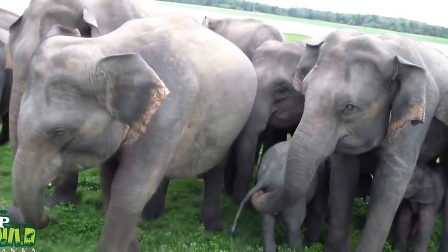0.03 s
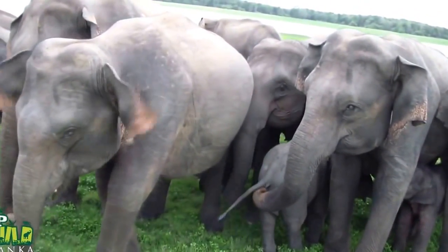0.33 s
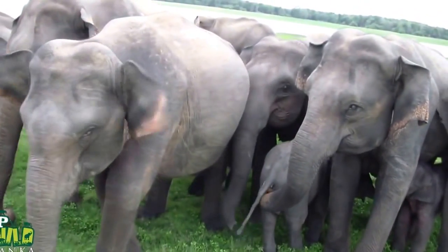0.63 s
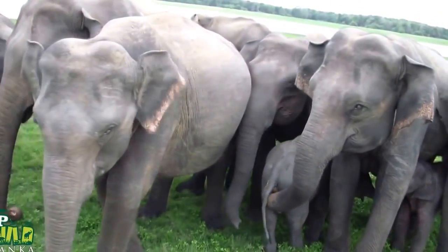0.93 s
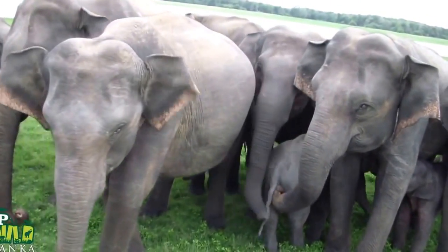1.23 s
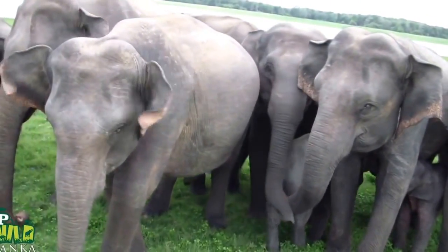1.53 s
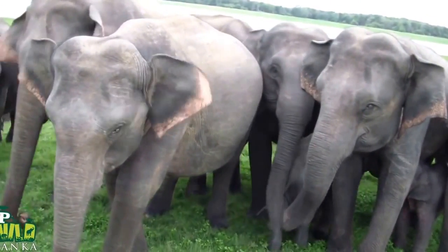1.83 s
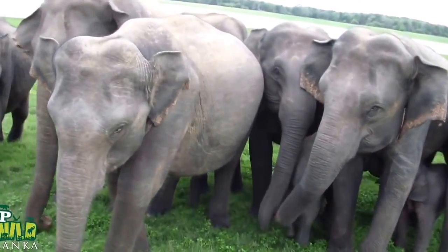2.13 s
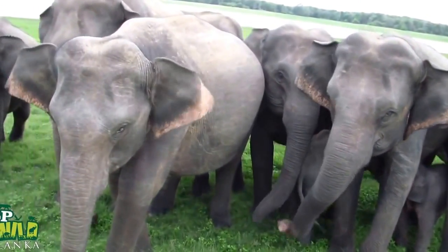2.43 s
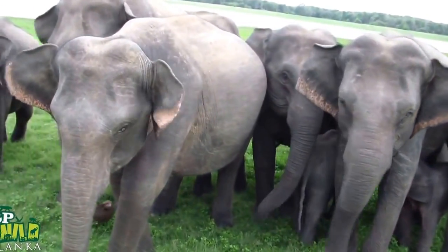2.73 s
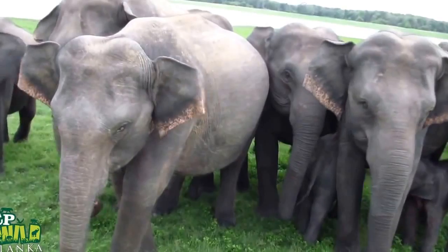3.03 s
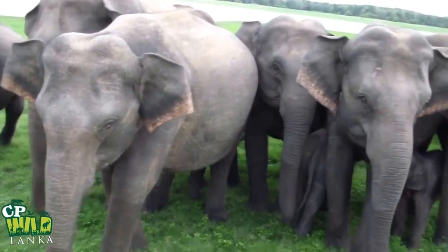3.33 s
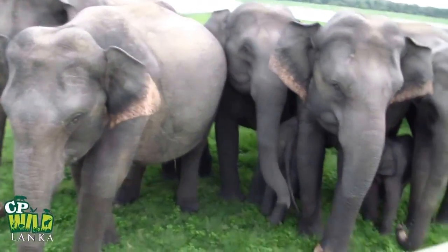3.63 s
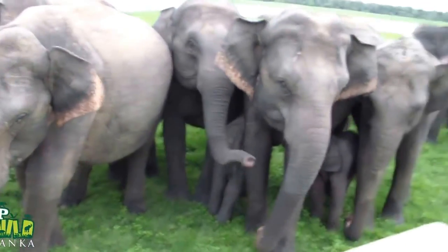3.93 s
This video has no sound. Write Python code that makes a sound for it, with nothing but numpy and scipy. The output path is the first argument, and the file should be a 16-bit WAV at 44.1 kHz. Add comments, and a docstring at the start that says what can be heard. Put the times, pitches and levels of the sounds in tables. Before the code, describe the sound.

A long, deep elephant rumble and one short, falling trumpet call in gusty wind.

```python
"""On open grassland, a herd of elephants stands close by. One holds a long, low rumble: its vocal
folds slap together and make its chest, trunk and mouth ring. A faint moan comes from further back.
Near the end another elephant blows a short, brassy trumpet through its trunk; it falls in pitch and
overloads the recorder. Wind buffets the microphone, mostly from the left, and one stalk snaps.
Behind it all lies a soft hiss of grass and microphone, with a wide, high camera-motor whirr."""
import sys
import numpy as np
from scipy import signal
from scipy.fft import rfft, irfft
from scipy.io import wavfile
from scipy.ndimage import uniform_filter1d

SR = 44100
rng = np.random.default_rng(int(sys.argv[2]) if len(sys.argv) > 2 else 0)


def waveform_to_disk(signal):
    """Save audio, clipped to [-1, 1], as 16-bit WAV at the path in sys.argv[1]."""
    frames = np.transpose(np.atleast_2d(signal))
    scaled = np.clip(frames, -1, 1) * 32767
    samples = np.round(scaled).astype(np.int16)
    wavfile.write(sys.argv[1], SR, samples)


N = 176400
T = np.arange(N) / SR
FREQS = np.fft.rfftfreq(N, 1 / SR)


def amp(db):
    """Turns decibels into a number to multiply by."""
    return 10 ** (np.asarray(db) / 20)


def unit(x):
    """Scales a signal to an average power of 1."""
    return x / np.sqrt(np.mean(x ** 2) + 1e-20)


def curve(table, column=1):
    """Joins the points of a time table with straight lines, one value per sample."""
    rows = np.array(table)
    return np.interp(T, rows[:, 0], rows[:, column])


def colour(table, hz):
    """Looks up how strong each frequency is, in dB."""
    freqs, db = np.transpose(table)
    return np.interp(np.log(hz + 1), np.log(freqs), db)


def tint(x, table):
    """Turns each frequency of a sound up or down as the table says."""
    return irfft(rfft(x) * amp(colour(table, FREQS)), N)


def noise(table):
    """Noise with the tone colour in the table."""
    return unit(tint(rng.standard_normal(N), table))


def wander(hz):
    """A smooth random wobble, up to about hz times a second."""
    return unit(irfft(rfft(rng.standard_normal(N)) * np.exp(-(FREQS / hz) ** 2), N))


def resonate(x, hz, *widths):
    """Makes x ring at hz; each width (Hz) filters once more, and narrower rings longer."""
    spin = np.exp(2j * np.pi * np.cumsum(hz * np.ones(N)) / SR)
    shifted = x / spin + 1e-18
    for width in widths:
        decay = np.exp(-np.pi * width / SR)
        shifted = signal.lfilter([1 - decay], [1, -decay], shifted)
    return 2 * (spin * shifted).real


def clicks(times, sizes):
    """Single clicks at the given times."""
    return np.bincount(np.clip(np.round(times * SR).astype(int), 0, N - 1), sizes, N)


def bursts(table, decay_s):
    """A loudness curve that jumps up and dies away once for each row."""
    ages = [(np.maximum(T - start, 0) / decay_s, db) for start, db in table]
    return sum(amp(db) * age * np.exp(1 - age) for age, db in ages)


def wind():
    """Wind buffets each side of the microphone, brighter in strong gusts, over a deep shared sway."""
    # strength of the wind (time [s], relative level [dB])
    gusts = [(0, -29.5), (.19, -28), (.22, -15.5), (.28, -19), (.6, -14.5), (.75, -20.5), (1.3, -21.5),
             (1.55, -9), (1.74, -14), (1.83, -7), (1.95, -12.5), (2.25, -10), (2.45, -10.5), (2.56, -9.5),
             (2.68, -8.5), (2.77, -14), (3.1, -16.5), (3.3, -13), (3.45, -16), (3.6, -12), (3.87, -9.5),
             (4, -18)]
    # tone colours of the buffeting and the sway (frequency [Hz], level [dB])
    wind_colour = [(10, -27), (25, 0.5), (50, 3), (90, 1.5), (150, 4), (260, -5), (400, -16), (600, -23),
                   (1000, -38.5), (1600, -57), (4000, -85)]
    sway_colour = [(8, -27), (25, -9), (60, -7), (120, -11.5), (300, -27.5), (1000, -55)]
    gust, shared_air, sides = curve(gusts), noise(wind_colour), []
    lowpass = signal.butter(2, 290, fs=SR, output="sos")
    for side_db in (3.5, -6):  # left, right
        air = unit(noise(wind_colour) + 0.71 * shared_air)
        buffet_db = 3.5 * wander(hz=21)
        low = signal.sosfiltfilt(lowpass, air)
        high = (air - low) * amp(0.99 * (gust - gust.max() + buffet_db) + 2.0)
        sides.append((low + high) * amp(gust + buffet_db + side_db))
    return np.array(sides) + amp(-24) * noise(sway_colour)


def background_hiss():
    """A soft hiss of grass and microphone, with a wide, high camera-motor whirr."""
    # strength of the hiss (time [s], relative level [dB])
    hiss_level = [(0.0, -35.5), (0.31, -33), (0.38, -39.5), (0.74, -28), (1.0, -33), (1.3, -36),
                  (1.53, -34.5), (1.91, -45), (1.95, -39.5), (2.13, -44), (2.26, -39.5), (2.28, -42),
                  (2.36, -39.5), (2.68, -35), (3.3, -35), (3.6, -36.5), (3.8, -36), (3.92, -34.5), (4, -36)]
    # its tone colour (frequency [Hz], level [dB])
    hiss_colour = [(100, -2.5), (600, 11), (1200, 4), (2000, -0.5), (2800, 1), (4000, 1.5), (5600, -3.5),
                   (7500, -1.5), (11000, 1.7), (15000, 0)]
    # stereo width; the wide 3-5 kHz band is the motor (frequency [Hz], side minus middle [dB])
    hiss_width = [(60, -2), (120, -4), (240, -57), (480, -55), (950, -23), (1890, -15), (3760, -0.5),
                  (7500, -6.5), (15000, -77)]
    spectrum = signal.stft(noise(hiss_colour), nperseg=512)[2]
    patches = uniform_filter1d(rng.standard_normal(spectrum.shape), size=14, axis=0)
    patch_db = 1.86 * unit(uniform_filter1d(patches, size=12, axis=1))
    middle = signal.istft(spectrum * amp(patch_db), nperseg=512)[1][:N]
    side = tint(noise(hiss_colour), hiss_width)
    return np.array([middle + side, middle - side]) * amp(7 + curve(hiss_level))


def rumble():
    """Vocal folds slap, each time with a weaker afterbeat and a puff of air; chest and mouth ring."""
    # how fast the folds slap (time [s], rate [slaps per s])
    slap_rate = [(0.3, 25.06), (0.5, 27.71), (0.7, 29.49), (1.0, 27.81), (1.4, 27.64), (1.7, 27.64),
                 (2.1, 27.28), (2.5, 27.92), (2.9, 28.53), (3.4, 28.51), (3.7, 29.64), (4.0, 29.31)]
    # slaps that hit the mouth harder (time [s], extra level [dB])
    hard_slaps = [(1.026, 5.5), (1.133, 3), (1.567, 4.5), (2.438, 8.5), (2.547, 6.5)]
    # how the folds close (time [s], afterbeat delay [s], afterbeat strength [0-1], air [0-1])
    folds = [(.7, .0075, .75, .45), (1.05, .011, .2, .4), (3.3, .0112, .4, .12), (4, .011, .3, .3)]
    # ringing of the chest and trunk, then of the mouth (frequency [Hz], width [Hz], level [dB])
    deep_rings = [(115.3, 26.5, 13.5), (136.5, 10.1, 14), (248.4, 23.5, -2.5), (370, 24.5, -6.5)]
    mouth_rings = [(625, 54.5, 7), (716.4, 13, 0), (878, 103, -12), (1048, 32, -7.5)]
    # the mouth's opening shifts its ringing (time [s], frequency multiplier [ratio])
    opening = [(.3, 0.99), (.46, 1.01), (.56, 1), (.7, 1.084), (1.0, 1.002), (1.6, 1.04), (2.5, 1.033),
               (3.2, .995), (4, 1.016)]
    # strength of the rumble (time [s], chest and trunk level [dB], mouth level [dB])
    levels = [(0, -28, -57), (.26, -53, -56), (.32, -14.5, -34), (.42, -15.5, -30), (.52, -14.5, -22),
              (.72, -19, -21), (.88, -16.5, -24.5), (1.06, -16.5, -20), (1.3, -15.5, -25),
              (1.58, -13, -22.5), (1.9, -24, -31), (2.2, -15.5, -25.5), (2.55, -17, -24.5),
              (2.8, -13, -21.5), (3.1, -13, -17.5), (3.45, -14.5, -17.5), (3.6, -14.5, -20.5),
              (3.77, -16, -18.5), (4, -14.5, -26)]
    jitter_s, afterbeat_jitter_s, uneven_db = .00008, .00015, 1.1
    deep_filter_hz, mouth_filter_hz = 254, 277

    cycles = .275 + np.cumsum(curve(slap_rate)) / SR
    times = T[1:][np.diff(np.floor(cycles)) > 0]  # one slap per cycle
    slap_shift, slap_size, after_shift, after_size = rng.standard_normal((len(times), 4)).T
    times = times + jitter_s * slap_shift
    slaps = clicks(times, amp(uneven_db * slap_size))
    accent = amp(sum(db * (abs(T - when) < .01) for when, db in hard_slaps))
    delay, strength = (np.interp(times, T, curve(folds, column)) for column in (1, 2))
    after_times = times + delay + afterbeat_jitter_s * after_shift
    afterbeats = clicks(after_times, strength * amp(uneven_db * after_size))
    puffs = .15 * unit(rng.standard_normal(N) * np.exp(-(cycles % 1)))
    breath = curve(folds, column=3) * rng.standard_normal(N)
    deep_push = puffs - unit(slaps)
    mouth_push = unit(slaps * accent + afterbeats) + breath

    deep, mouth = 0, 0
    for k, (hz, width, db) in enumerate(deep_rings):
        deep += (-1) ** k * amp(db) * resonate(deep_push, hz, width, deep_filter_hz)
    for k, (hz, width, db) in enumerate(mouth_rings):
        wobble = 1 + 0.03 * (k > 1) * wander(hz=6.2)  # only the top two wobble
        ring_hz = hz * curve(opening) * wobble
        mouth += (-1) ** k * amp(db) * resonate(mouth_push, ring_hz, width, mouth_filter_hz)
    return unit(deep) * amp(curve(levels)) + unit(mouth) * amp(curve(levels, column=2))


def moan():
    """A thin, wavering tone from further back in the herd."""
    # the far call (time [s], pitch [Hz], level [dB])
    call = [(.05, 274.4, -39.5), (.17, 351.4, -39), (.24, 394, -34), (.45, 392, -40.5), (.7, 366.3, -32.5),
            (.95, 385, -30), (1.1, 392.5, -22), (1.22, 395, -28), (1.35, 360, -98)]
    pitch = curve(call) * (1 + 0.018 * wander(hz=28))
    tone = np.sqrt(2) * np.sin(2 * np.pi * np.cumsum(pitch) / SR)
    return tone * amp(curve(call, column=2)) * (T < call[-1][0])


def grunts():
    """Two rough pushes of air before the rumble finds its beat."""
    # the pushes (time [s], level [dB])
    pushes = [(.305, -21), (.373, -19.5)]
    # their tone colour (frequency [Hz], level [dB])
    grunt_colour = [(60, -20), (140, 0), (700, -9), (1100, -45)]
    return noise(grunt_colour) * bursts(pushes, decay_s=.0093)


def snap():
    """A stalk of grass snaps with a tiny burst of noise."""
    # tone colour of the snap (frequency [Hz], level [dB])
    snap_colour = [(600, -16), (1600, 2), (4200, 7), (6000, -25), (15000, -27)]
    start_s, decay_s = .712, .0035
    age = T - start_s
    return noise(snap_colour) * amp(-15) * np.exp(-abs(age) / decay_s) * (age > 0)


def trunk_air():
    """Air blasts through the trunk, sputtering as the trumpet catches and lets go."""
    # the blast's strength, then the single sputters (time [s], level [dB])
    blast_level = [(2.71, -44), (2.77, -24), (2.82, -20), (2.85, -14.5), (2.97, -18), (3.05, -19.5),
                   (3.12, -25), (3.2, -29.5), (3.35, -40.5)]
    sputters = [(2.716, -24.5), (2.763, -16), (2.784, -13.5), (2.805, -13), (3.056, -15.5), (3.103, -19.5)]
    # their tone colours (frequency [Hz], level [dB])
    blast_colour = [(500, -21), (1000, -6.5), (1350, 1.5), (1600, -7), (1900, -0.5), (2300, -12),
                    (3100, -1.5), (3700, -12.5), (4300, -11), (5300, -21), (7600, -14.5), (10000, -26),
                    (15000, -35)]
    sputter_colour = [(700, -8), (1900, 1), (2600, -11), (3200, 4), (4200, -8), (5200, -20), (15000, -28)]
    blast = noise(blast_colour) * amp(curve(blast_level))
    return blast + noise(sputter_colour) * bursts(sputters, decay_s=.0027)


def trumpet():
    """A fluttering, rasping tone in the trunk, brassier when loud."""
    # the call (time [s], pitch [Hz], level [dB], strongest ringing [Hz])
    call = [(2.75, 659.5, -55, 1300), (2.8, 648, -16, 1300), (2.825, 642.3, -9, 1510),
            (2.855, 634, -2.5, 1590), (2.91, 635.3, -2, 1970), (2.96, 634, -2.5, 1600),
            (3.0, 615.5, -3, 1250), (3.065, 612.5, -8.5, 1150), (3.11, 574.3, -12.5, 1428),
            (3.16, 572.3, -16, 1300), (3.23, 540, -24, 1100), (3.28, 520, -37, 1050)]
    # how the trunk colours the tone (frequency [Hz], level [dB])
    trunk_colour = [(600, -2.5), (1150, -1.5), (1900, 4.5), (2500, 6), (3150, 4), (3800, -4.5),
                    (4450, -3.5), (5200, -16), (7000, -17.5), (10000, -26), (15000, -33)]
    ring_db, ring_width_hz, flutter_depth = 12.5, 294, 0.091
    pitch, level_db, ring_hz = (curve(call, column) for column in (1, 2, 3))
    waver, rasp = .0015 * wander(hz=38), .008 * wander(hz=393)
    phase = 2 * np.pi * np.cumsum(pitch * (1 + waver + rasp)) / SR
    flutter_hz = 50.6 * (1 + 0.091 * wander(hz=20.8))
    flutter = 1 + flutter_depth * np.sin(2 * np.pi * np.cumsum(flutter_hz) / SR)
    tone, power = 0, 0
    for k in range(1, 21):  # harmonics: whole multiples of the pitch
        hz = k * pitch
        dulling_db = 0.97 * (level_db - level_db.max()) * np.log2(max(k / 2, 1))
        boost_db = ring_db * np.exp(-((hz - ring_hz) / ring_width_hz) ** 2)
        gain = amp(colour(trunk_colour, hz) + dulling_db + boost_db)
        flicker_db = 1.7 * wander(hz=106) * min(k / 4, 1)
        tone += gain * amp(flicker_db) * np.cos(k * phase + 2 * np.pi * rng.random())
        power += gain ** 2 / 2
    fade = uniform_filter1d(1. * (T > call[0][0]) * (T < call[-1][0]), size=800)
    return tone / np.sqrt(power) * amp(level_db) * flutter * fade


def ground_echoes(x):
    """Adds brief echoes that bounce off the ground and the bodies of the herd."""
    echo_db, fade_s = -17, .16
    age = T[:SR // 2]
    shape = (2, len(age))
    echoes = rng.standard_normal(shape) * (rng.random(shape) < .05) * amp(-60 * age / fade_s)
    echoes /= np.linalg.norm(echoes[0])
    return x + amp(echo_db) * signal.fftconvolve(x[None], echoes, axes=1)[:, :N]


def scene():
    """Mixes the herd's calls with the wind and background hiss, in stereo."""
    calls = ground_echoes(trumpet() + trunk_air() + moan())
    close_rumble = rumble() * amp([[0.06], [-0.06]])  # almost dead centre
    return calls + close_rumble + wind() + background_hiss() + snap() + grunts()


def record(dry):
    """The recorder overloads, rounding off loud peaks, and loses the highest treble."""
    # the recorder's treble droop (frequency [Hz], level [dB])
    droop = [(9000, 0), (15000, -6)]
    drive_db, hardness, cutoff_hz = -1.5, 7.9, 15400
    driven = dry * amp(drive_db)
    rounded = driven / (1 + abs(driven) ** hardness) ** (1 / hardness)
    lowpass = signal.firwin(511, cutoff_hz, window=("kaiser", 9), fs=SR)
    return signal.oaconvolve(tint(rounded, droop), lowpass[None], "same")


dry = scene()
out = record(dry)
waveform_to_disk(out)
```